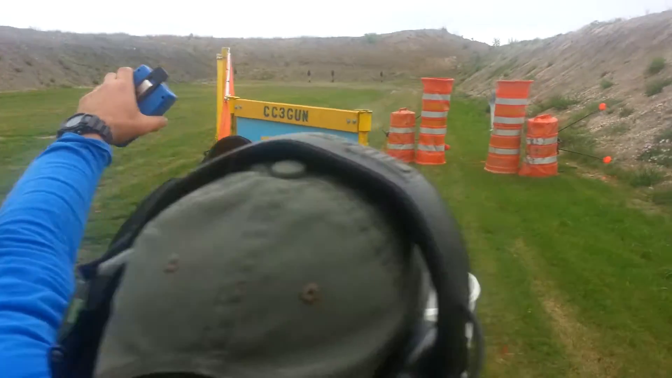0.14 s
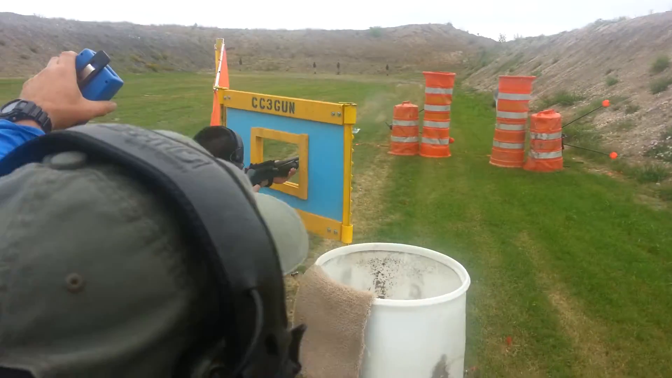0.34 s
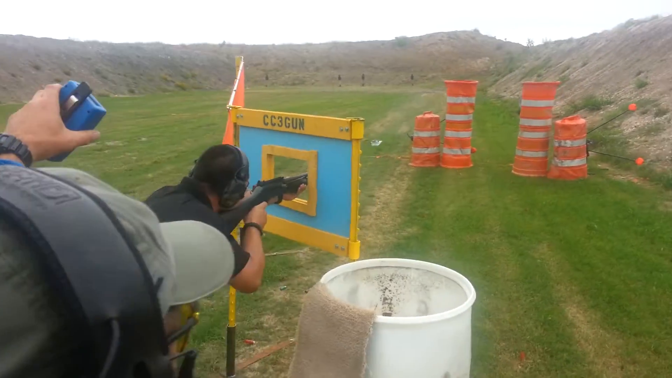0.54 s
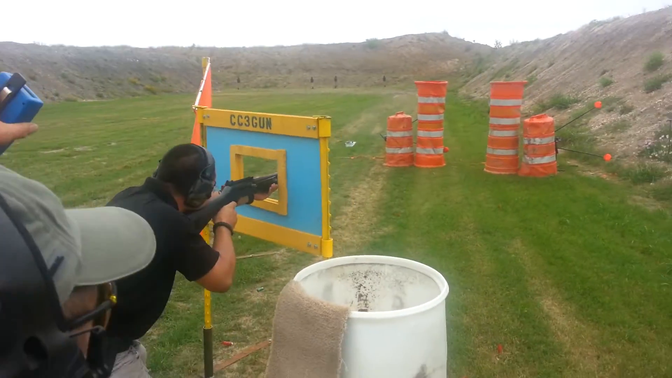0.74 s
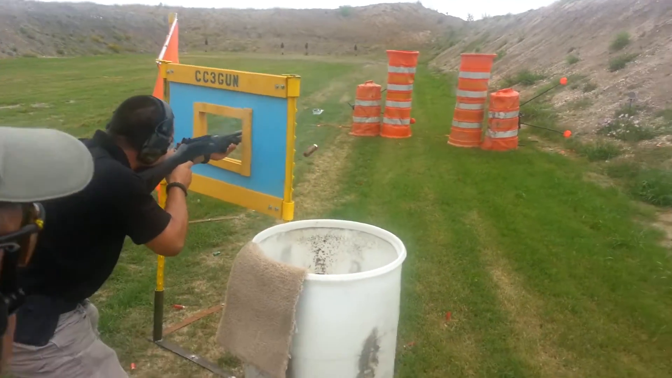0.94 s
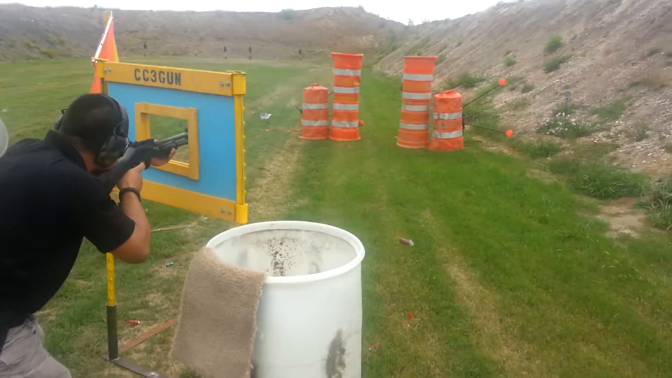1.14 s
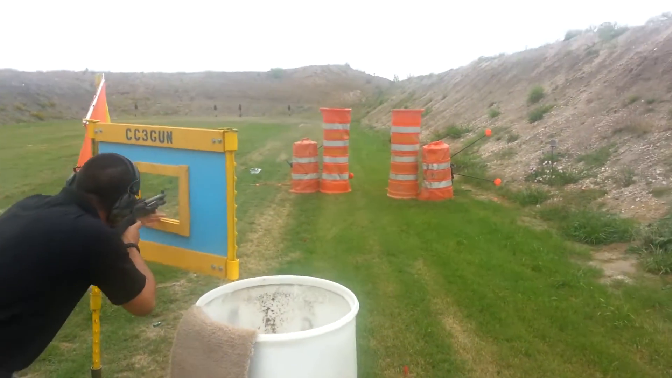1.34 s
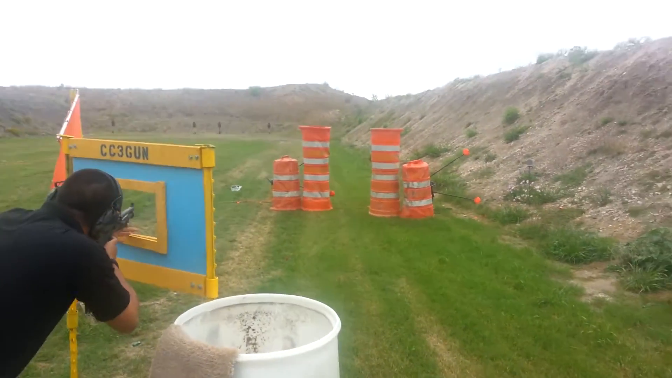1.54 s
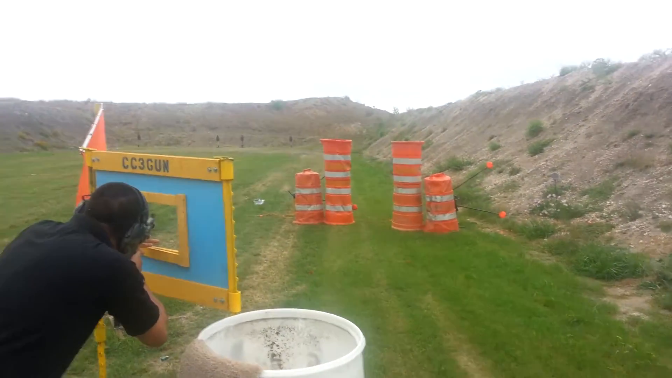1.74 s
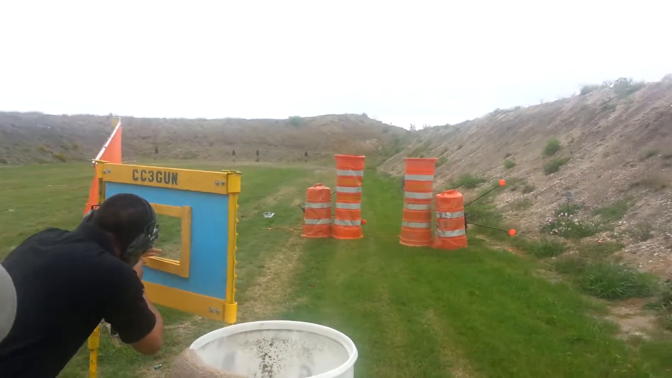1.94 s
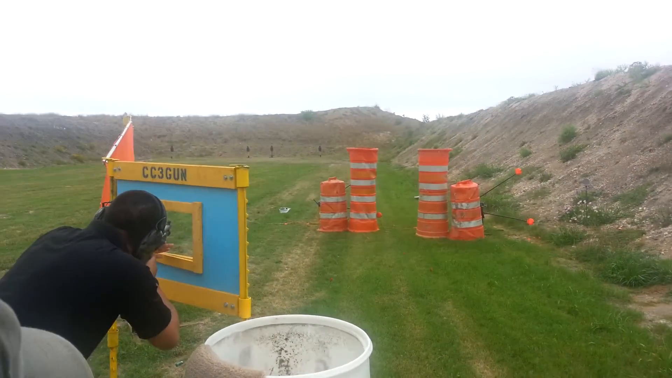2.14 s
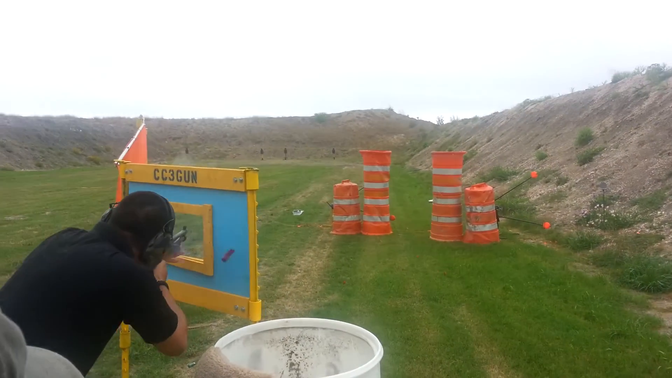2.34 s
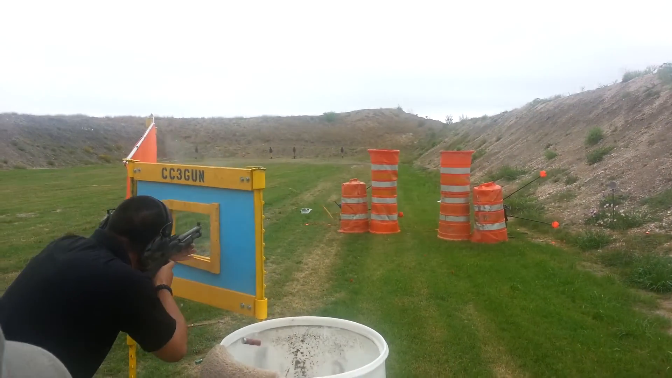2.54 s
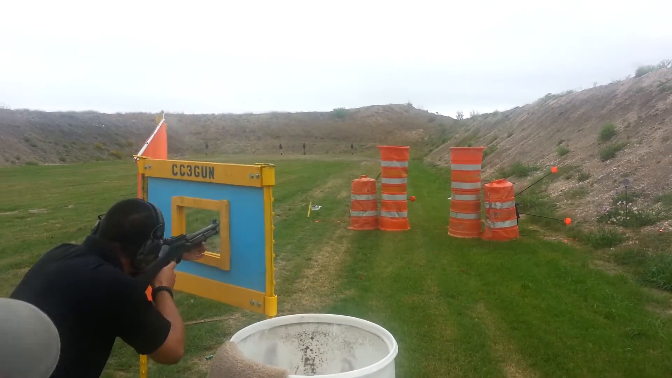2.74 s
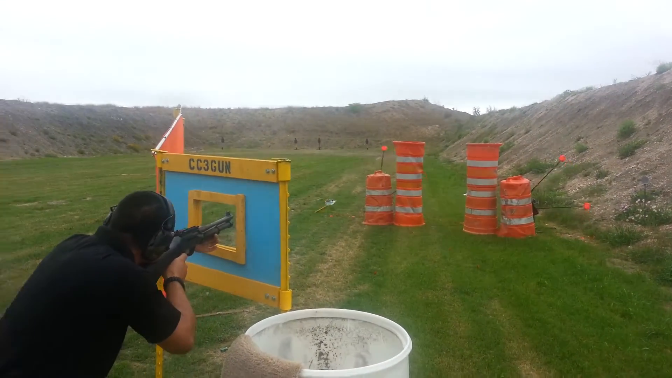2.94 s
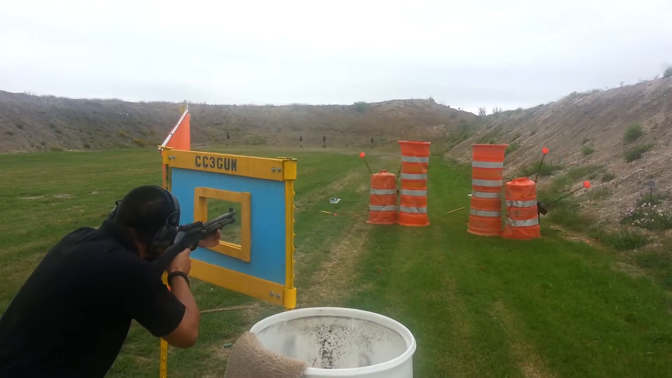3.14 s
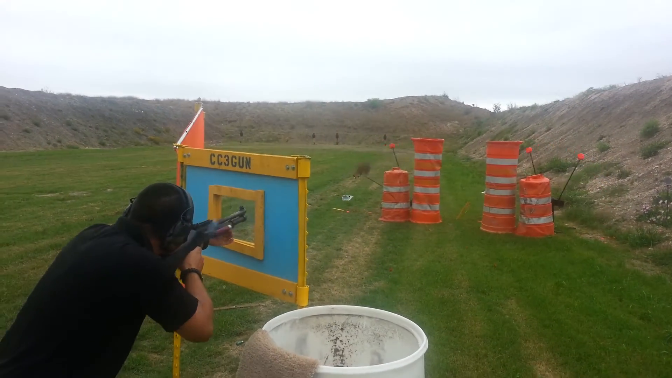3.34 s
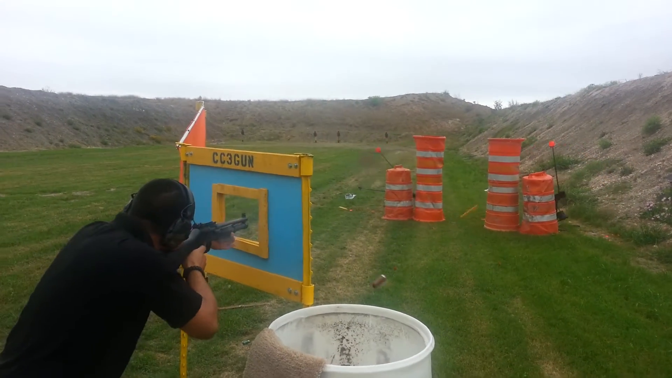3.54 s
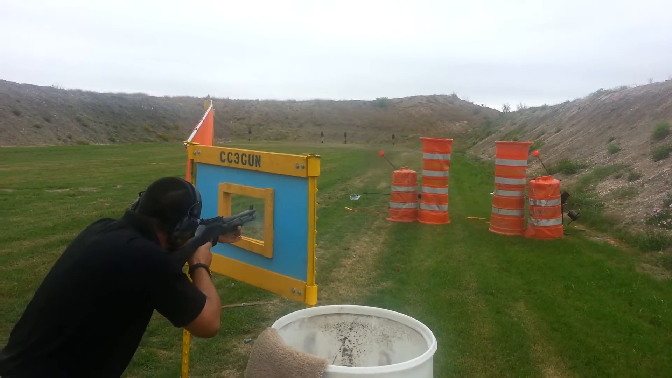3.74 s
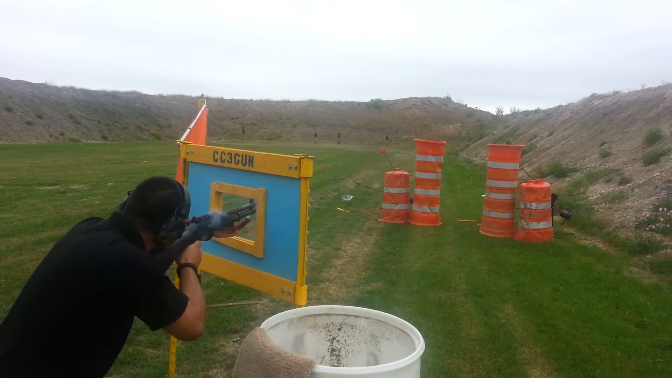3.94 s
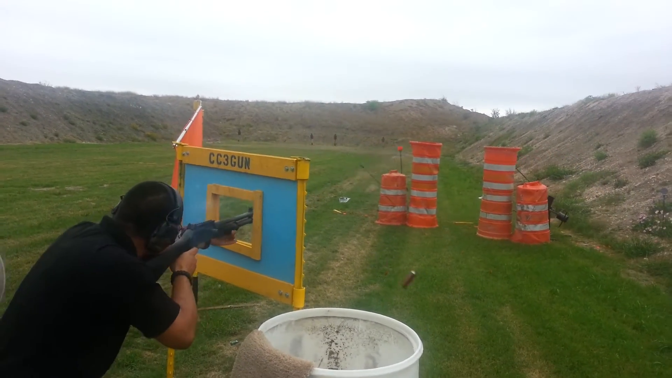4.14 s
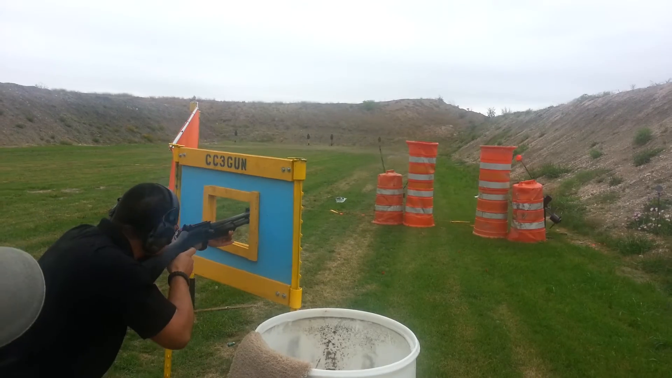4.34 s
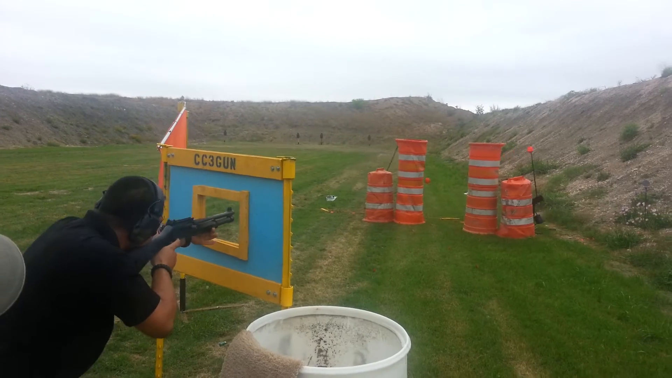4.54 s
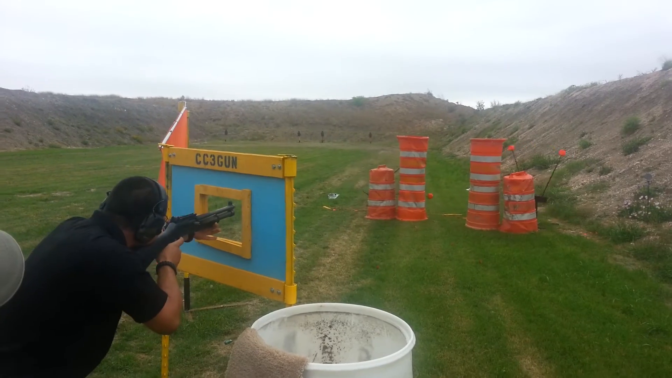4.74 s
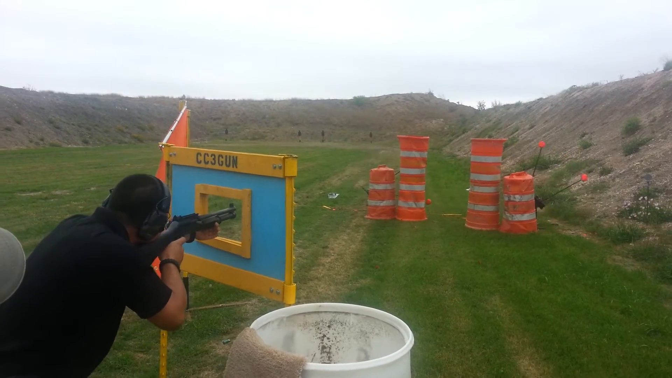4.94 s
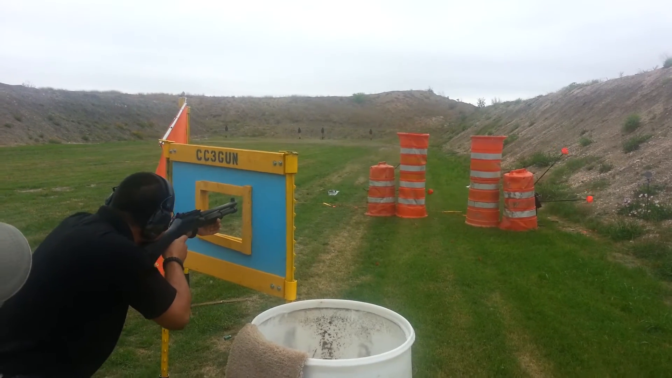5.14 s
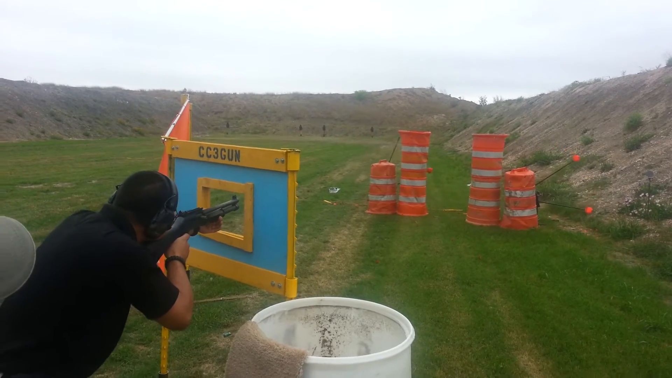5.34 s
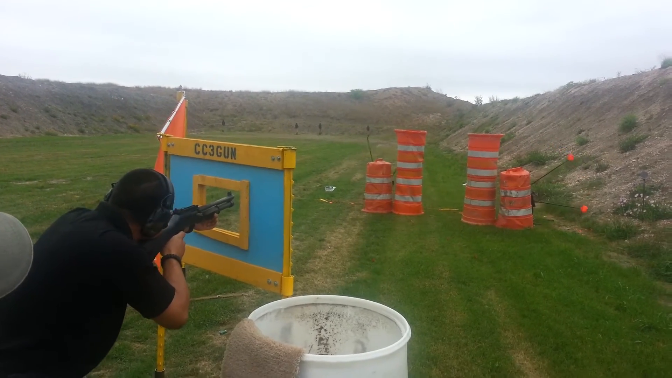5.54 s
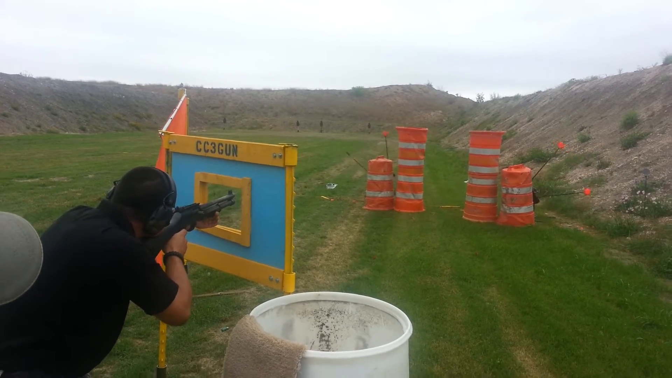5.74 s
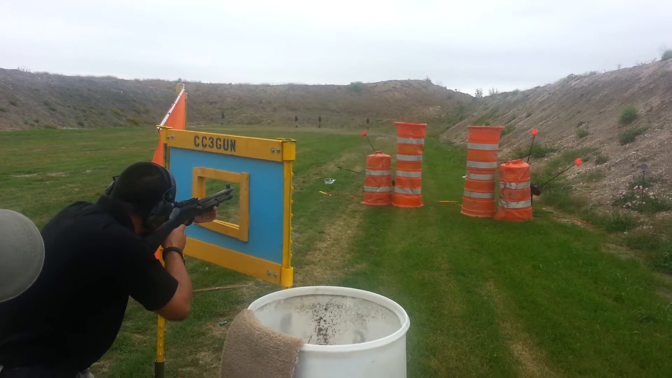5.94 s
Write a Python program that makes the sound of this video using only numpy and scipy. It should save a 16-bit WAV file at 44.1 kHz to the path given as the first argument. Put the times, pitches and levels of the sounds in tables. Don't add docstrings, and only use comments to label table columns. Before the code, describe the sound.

Beside a self-loading shotgun on a grassy outdoor range, gear rattles briefly before four distorted blasts, the last two in quick succession. Each rolls back from earth banks. The bolt slams, steel rings, and ejected shells knock on a hollow plastic drum between the second and third shots. Faint ticks and soft wind follow.

```python
import sys
import numpy as np
from scipy import signal
from scipy.fft import rfft, irfft
from scipy.io import wavfile
from scipy.ndimage import uniform_filter1d

SR = 44100
rng = np.random.default_rng(int(sys.argv[2]) if len(sys.argv) > 2 else 0)


def to_linear_factor(level_db):
    exponent = np.asarray(level_db, float) / 20
    return 10 ** exponent


def bounce(signal):
    frames = np.transpose(np.atleast_2d(signal))
    limited = np.clip(frames, -1, 1)
    pcm = np.round(limited * 32767).astype(np.int16)
    wavfile.write(sys.argv[1], SR, pcm)


N = 265041


def colour(x, points):
    hz, db = np.transpose(points)
    size = x.shape[-1]
    bins_hz = np.arange(size // 2 + 1) * SR / size
    gain = to_linear_factor(np.interp(np.log(bins_hz + 1), np.log(hz), db, left=-90, right=-90))
    y = irfft(rfft(x) * gain, size)
    return y / np.sqrt(np.mean(y ** 2))


def pair(size, alike):
    alike = np.clip(alike, 0, 1)
    mid, left, right = rng.standard_normal((3, size))
    return np.sqrt(alike) * mid + np.sqrt(1 - alike) * np.array([left, right])


def add(out, s, sound, pan_db):
    i = int(s * SR)
    sound = sound[..., :N - i]
    out[:, i:i + sound.shape[-1]] += sound * to_linear_factor(np.array([[pan_db], [-pan_db]]) / 2)


def fade(t, t60):
    return np.exp(-np.log(1000) * t / max(t60, 1e-3))


def bump(t, middle, half):
    return np.exp(-((t - middle) / max(half, 1e-3)) ** 2)


# middle t/s, level/dB, half length t/s
GUSTS = [(1.43, -53, .03), (2.672, -43, .015), (2.78, -45, .04), (2.87, -44, .04), (2.945, -41, .03),
         (3.135, -42, .03), (2.5, -42, .06), (3.3, -45, .05), (3.53, -45, .05), (4.11, -42, .05),
         (4.6, -50, .05), (4.835, -53, .02)]
# f/Hz, level/dB
WIND = [(25, -30), (60, -7), (110, -7), (160, 0), (260, -6), (420, -14), (800, -28), (1400, -60)]
# f/Hz, level/dB
THUD = [(45, -26), (110, -4), (190, 0.5), (310, -6), (550, -30)]
# f/Hz, level/dB
HISS = [(200, -10), (400, -1), (800, -2), (1500, -6), (2600, -7), (4100, -7), (5000, -11), (6300, -16),
        (9000, -11), (12000, -14), (14300, -17), (14800, -60)]
CALM_DB, HISS_DB = -55.5, -55


def air(duck):
    t = np.arange(N) / SR
    gust = np.sqrt(sum((to_linear_factor(db) * bump(t, s, half)) ** 2 for s, db, half in GUSTS))
    puffs = np.repeat(rng.standard_normal(N // 500 + 1), 500)
    puffs = uniform_filter1d(puffs, size=500)[:N]
    breeze = colour(pair(N, .4), WIND) * to_linear_factor(CALM_DB + 1.8 * puffs)
    buffets = colour(pair(N, .6), THUD) * gust * to_linear_factor(4.5 * puffs)
    hiss = to_linear_factor(HISS_DB) * colour(pair(N, .1), HISS)
    return breeze + buffets + duck * hiss


# f/Hz, level/dB, t60/s
BUCKLE = [(1705, -25, .1), (2178, -27, .13), (3560, -43, .5), (4100, -41, .15), (4700, -44, .2),
          (5580, -43, .3)]
# f/Hz, level/dB, t60/s
CLIP = [(2780, -35, .1), (5580, -36, .11)]
# f/Hz, level/dB, t60/s
PLATE = [(829, -26.5, .82), (1728, -40, .7)]
# f/Hz, level/dB, t60/s
BARREL = [(3685, -9, .17), (4400, -27, .15), (5103, -26.5, .55), (7720, -23, .25), (9012, -21, .2)]
# f/Hz, level/dB, t60/s
TUBE = [(4624, -22, .14), (7720, -28, .5), (12750, -34, .4)]
# f/Hz, level/dB, t60/s
BRASS = [(1841, -35, .1), (2616, -35, .1), (5500, -40, .06), (8339, -48, .12)]
# f/Hz, level/dB, t60/s
RIM = [(2080, -26, .045), (3300, -34, .035)]
# modes, t/s, swell/s, left minus right/dB
STRIKES = [
    (BUCKLE, 0.0, .004, 0),
    (CLIP, .205, .03, 0),
    (PLATE, .85, .02, 0),
    (PLATE, .93, .1, 0),
    (BARREL, 2.265, .03, -6),
    (TUBE, 2.385, .035, -6),
    (BRASS, 2.668, .003, -8),
    (RIM, 3.0715, .002, -4),
]
# t/s, f/Hz, level/dB, t60/s
PINGS = [
    (.194, 6750, -37, .09),
    (.194, 6080, -39, .05),
    (.194, 7350, -41, .06),
    (0.918, 10580, -25, .2),
    (1.434, 6900, -42, .04),
    (1.44, 1250, -44, .04),
    (4.027, 8950, -22, .1),
    (4.527, 1275, -28, .04),
]
PING_SWELL_S = .004


def rings():
    out, t = np.zeros((2, N)), np.arange(SR) / SR
    struck = [(s, swell, pan_db) + mode for modes, s, swell, pan_db in STRIKES for mode in modes]
    pings = [(row[0], PING_SWELL_S, 0) + row[1:] for row in PINGS]
    for s, swell, pan_db, hz, db, t60 in struck + pings:
        waver_cycles = 14 * t * (1 + rng.random()) + rng.random()
        waver = 1 + .2 * np.sin(2 * np.pi * waver_cycles)
        phase = rng.standard_normal((2, 1)) * hz / 2000
        tone = np.sin(2 * np.pi * hz * t + phase)
        swell_and_die = np.minimum(t / swell, 1) * fade(np.maximum(t - swell, 0), t60)
        add(out, s, to_linear_factor(db) * swell_and_die * waver * tone, pan_db)
    return out


# t/s, peak level/dB, crack level/dB, left minus right/dB
KNOCKS = [
    (2.765, 0, -5, -6),
    (3.031, -5, -6.5, -7),
    (3.221, -8, -7.5, -5.5),
]
# f/Hz, level/dB, t60/s
DRUM = [(644, -8, 0.15), (750, 7, 0.22), (910, -9.5, 0.27), (1435, 5, 0.054), (2540, -3.5, 0.034),
        (2640, -14.5, 0.064), (3570, -11.5, 0.038), (4230, -9.5, 0.041), (4100, -17, 0.039)]
# delay t/s, level/dB
DRUM_REPEATS = [
    (0.0032, -2.5),
    (0.0135, -13.5),
]
# f/Hz, level/dB
HOLLOW = [(120, -45), (300, -8.5), (600, 0.5), (1100, -5), (2000, -10.5), (4000, -35)]
DRUM_DAMP_S = .042


def knocks():
    out, t = np.zeros((2, N)), np.arange(4096) / SR
    for s, db, crack_db, pan_db in KNOCKS:
        for delay, bounce_db in [(0, 0.0064)] + DRUM_REPEATS:
            body = 0
            for hz, mode_db, t60 in DRUM:
                spot = rng.standard_normal(3)
                tone = np.sin(2 * np.pi * hz * t + .6 * spot[1:, None])
                body = body + to_linear_factor(mode_db + 1.5 * spot[0]) * tone * fade(t, min(t60, DRUM_DAMP_S))
            crack = colour(pair(len(t), 0.94), CRACK) + to_linear_factor(-19) * colour(pair(len(t), .2), SIZZLE)
            snap = to_linear_factor(crack_db + 12) * crack * (fade(t, .008) + to_linear_factor(-8) * fade(t, .05))
            tail = to_linear_factor(-1) * colour(pair(len(t), .6), HOLLOW) * (fade(t, .07) + to_linear_factor(-15) * fade(t, .17))
            add(out, s + delay, to_linear_factor(db + bounce_db - 15) * (body + tail + snap), pan_db)
    return signal.sosfilt(signal.butter(3, 430, "high", fs=SR, output="sos"), out)


# t/s, peak level/dB, loudest f/Hz, treble level/dB, length t/s
GEAR = [(0.0024, -26.5, 1700, -15.5, 0.074), (0.034, -34, 2030, -8.5, 0.055), (0.06, -37, 1400, -13, .08),
        (0.1413, -40.5, 1660, -13, 0.04), (0.165, -36.5, 1430, -9, 0.09), (0.194, -28, 1540, -5, 0.046),
        (0.215, -32, 1800, -8, .07), (0.2627, -46.5, 1060, -8, 0.039), (0.2852, -41, 1950, -12, 0.055)]
# t/s, peak level/dB, loudest f/Hz, length t/s
SCUFFS = [(0.0, -36, 580, .12), (0.14, -42, 500, .06), (0.19, -38, 600, .1), (0.255, -40, 450, .06),
          (2.544, -21, 700, .04)]
# t/s, peak level/dB, loudest f/Hz, treble level/dB, left minus right/dB
BOLT_BACK = [
    (0.8589, -9, 1270, -12, -3),
    (0.8744, -17.5, 2760, -7.5, -4.5),
    (3.413, -9, 2300, -16, 1.5),
    (3.984, -6, 2764, -16, -0.5),
]
# t/s, peak level/dB, loudest f/Hz, treble level/dB, rebound level/dB
BOLT_SHUT = [
    (0.9082, -5, 2130, -8, -5),
    (2.334, -9, 2000, -5, -12),
    (3.431, 1.5, 3900, -1.5, -3),
    (4.0133, -3, 3800, -0.5, -4),
]
# t/s, peak level/dB, loudest f/Hz, length t/s, left minus right/dB
CLAPS = [(1.1544, -28.5, 1990, 0.046, 0.5), (1.1862, -22.5, 1327, 0.023, -6), (2.496, -24, 1660, 0.053, -4),
         (2.5487, -23.5, 3700, 0.024, -7.5), (3.649, -27.5, 1900, 0.047, -3), (3.694, -24, 1400, 0.04, 1.2),
         (4.228, -27, 2000, .015, -2.2), (4.273, -21.5, 1960, 0.017, -1.5), (4.3068, -23.5, 1970, 0.03, 5),
         (4.3314, -34, 1630, 0.017, 1.5)]
# t/s, peak level/dB, loudest f/Hz, treble level/dB, length t/s
TICKS = [(0.358, -52, 3900, 6, .015), (1.3, -50, 3000, -10, .08), (1.404, -46, 1100, -10, .02),
         (1.428, -48, 4000, 6, .03), (1.435, -37, 4090, 4, .025), (1.4416, -39, 1210, -3, 0.03),
         (2.544, -26, 900, 2.5, .02), (2.995, -24, 1200, -4, .05), (3.0045, -17, 3200, -2, .02),
         (3.2935, -24, 1500, -18, .03), (4.4, -48, 1000, -4, .02), (4.522, -44, 3000, 5, .012),
         (4.6, -41, 2600, 3, .01), (4.79, -60, 4000, 8, .01), (4.99, -60, 4000, 8, .01),
         (5.13, -55, 4400, 2, .01)]
# t/s, peak level/dB, loudest f/Hz, treble level/dB, left minus right/dB
CLICKS = [(0.8635, -13, 4800, 10.5, 3.5), (0.9472, -17.5, 3950, 0, -3.5), (2.3305, -23, 5000, 12, -6),
          (1.1193, -20, 2010, -5.5, -1.0), (2.6675, -28.5, 1800, -14, -5), (3.0709, -26.5, 2090, 2, -3),
          (3.479, -20, 3330, 1, 2), (3.7775, -29, 1786, -7, 3.0), (3.9931, -9, 2762, -10.5, -1.5),
          (4.0534, -18.5, 3270, 0, 2), (4.2338, -22, 1790, -12.5, 1)]
GEAR_PAN_DB, SCUFF_TOP_DB, SCUFF_PAN_DB = -1.5, -30, -1.5
BOLT_S, BOLT_PAN_DB, REBOUND_S, REBOUND_HZ, REBOUND_TOP_DB = .03, -3.5, .0047, 3200, -5
CLAP_TOP_DB, CLICK_S = -18, .014
TICK_LEAN_DB = -6


def clack_rows():
    rows = [row + (GEAR_PAN_DB,) for row in GEAR]
    rows += [(s, db, hz, SCUFF_TOP_DB, length, SCUFF_PAN_DB) for s, db, hz, length in SCUFFS]
    rows += [(s, db, hz, top_db, BOLT_S, pan_db) for s, db, hz, top_db, pan_db in BOLT_BACK]
    for s, db, hz, top_db, rebound_db in BOLT_SHUT:
        rows.append((s, db, hz, top_db, BOLT_S, BOLT_PAN_DB))
        rows.append((s + REBOUND_S, rebound_db, REBOUND_HZ, REBOUND_TOP_DB, BOLT_S, BOLT_PAN_DB / 2))
    rows += [(s, db, hz, CLAP_TOP_DB, length, pan_db) for s, db, hz, length, pan_db in CLAPS]
    rows += [row + (TICK_LEAN_DB * (row[1] > -32),) for row in TICKS]
    rows += [(s, db + 4.5, hz, top_db, CLICK_S, pan_db) for s, db, hz, top_db, pan_db in CLICKS]
    return rows


def clacks():
    out, t = np.zeros((2, N)), np.arange(4096) / SR
    for s, db, hz, top_db, length, pan_db in clack_rows():
        shelf_db = min(1.1 * top_db - 5, -8)
        resonance = [(hz / 3, -24), (hz / 1.8, -8), (hz, 0), (hz * 1.3, -7), (5600, shelf_db), (7000, -45)]
        body = colour(pair(len(t), .2), resonance)
        edge = colour(pair(len(t), 0.13), SIZZLE) * to_linear_factor(top_db)
        chatter = np.minimum(t / .0005, 1) * fade(t ** 2 / length, length)
        chatter = chatter + to_linear_factor(-18) * fade(t, 3 * length)
        add(out, s, to_linear_factor(db - 5.5) * chatter * (body + edge), pan_db)
    return out


# delay t/ms, level/dB, hold t/ms, fall/(dB per ms), dullness 0-1
PATHS = [
    (-7.5, -21, 7, 3.0, 0.05),
    (0.4, 6.5, 22, 0.68, 0.01),
    (41.5, -0.6, 15, 0.8, 0.99),
    (42, -14, 1.5, 0.075, 0.06),
    (384, -30, 59, 0.6, 0.25),
]
RISE_MS, SAG_DB_PER_MS = 1.6, .2
RANGE_END_MS, END_DROP_DB, END_DROP_MS, END_FALL_DB_PER_MS = 447, -6, 22, .07


def paths(ms, sharp_db, dull_db):
    power = 0
    for delay, db, hold, fall, dull in PATHS:
        since = ms - delay
        path_db = db + sharp_db + dull * (dull_db - sharp_db)
        path_db = path_db - SAG_DB_PER_MS * np.clip(since, 0, hold) - fall * np.maximum(since - hold, 0)
        rise = np.clip(1 + since / RISE_MS, 0, 1) ** 2
        power = power + (to_linear_factor(path_db) * rise) ** 2
    past = np.maximum(ms - RANGE_END_MS, 0)
    return np.sqrt(power) * to_linear_factor(END_DROP_DB * np.minimum(past / END_DROP_MS, 1) - END_FALL_DB_PER_MS * past)


# t/s, charge level/dB, left minus right/dB, boom level/dB, sizzle level/dB
SHOTS = [
    (0.777, -1, -1, -7, 0.5),
    (2.2072, -3, -5, -7, 0.5),
    (3.3105, -0.5, 1, -8, 0),
    (3.8904, -0.5, 0.5, -7.5, 0),
]
# f/Hz, level/dB
BOOM = [(25, -25.5), (70, -14.5), (150, -8), (260, 3), (500, 0.5), (1100, -2), (1900, -10), (3500, -36)]
# f/Hz, level/dB
CRACK = [(300, -30.5), (800, -4.5), (1500, -2), (2600, -1.5), (4200, -1.5), (5200, -6), (6500, -30.5)]
# f/Hz, level/dB
SIZZLE = [(3500, -32), (5200, -8.5), (6300, -1.5), (8500, 0.5), (10500, -1.5), (12000, -9), (13500, -11),
          (15000, -19.5), (21000, -50)]
BOOM_SHARP_DB, BOOM_DULL_DB, SIZZLE_SHARP_DB, SIZZLE_DULL_DB = -6.8, 4.2, -1.6, -8
AIR_DB_PER_MS = .009
THUD_MS, THUD_DB, THUD_HALF_MS = 372, -39, 28


def shots():
    out = np.zeros((2, N))
    size = 32768
    ms = np.arange(size) / SR * 1000 - 10
    for s, db, pan_db, low_db, top_db in SHOTS:
        lumps = np.repeat(rng.standard_normal((3, 128)), 256, axis=1)
        lumps = uniform_filter1d(lumps, size=256) * np.clip(ms / 100, 0, 1)
        boom = colour(pair(size, .85), BOOM) * to_linear_factor(low_db + 3.5 * lumps[0])
        boom = boom * paths(ms, BOOM_SHARP_DB, BOOM_DULL_DB)
        crack = colour(pair(size, .1), CRACK) * to_linear_factor(2.2 * lumps[1]) * paths(ms, 0, 0)
        sizzle = colour(pair(size, 0.032), SIZZLE) * to_linear_factor(top_db + 1.5 * lumps[2] - AIR_DB_PER_MS * ms)
        sizzle = sizzle * paths(ms, SIZZLE_SHARP_DB, SIZZLE_DULL_DB)
        thud = colour(pair(size, .6), THUD) * to_linear_factor(THUD_DB) * bump(ms, THUD_MS, THUD_HALF_MS)
        add(out, s + ms[0] / 1000, to_linear_factor(db) * (boom + crack + sizzle + thud), pan_db)
    return out


DEAF_MS, DEAF_HALF_MS, DEAF_HZ = 205, 40, 110


def deafen(field):
    ms = np.arange(N) / SR * 1000
    deaf = sum(bump(ms, shot[0] * 1000 + DEAF_MS, DEAF_HALF_MS) for shot in SHOTS)
    bass = signal.sosfiltfilt(signal.butter(2, DEAF_HZ, fs=SR, output="sos"), field)
    return field - np.minimum(1.3 * deaf, 1) * bass


def scene():
    blasts = shots()
    loud = uniform_filter1d(np.abs(blasts).mean(axis=0), size=1500)
    duck = 1 / (1 + loud / to_linear_factor(-41))
    return deafen(air(duck) + rings() + knocks() + clacks() + blasts)


# t/ms after a shot, highest f/Hz kept
KEPT = [(-30, 14700), (0, 16000), (70, 15200), (150, 14300), (200, 12800), (300, 11700), (440, 11400),
        (480, 14700)]


def thin_tails(x):
    hz, s, frames = signal.stft(x, SR, nperseg=512)
    ms, kept_hz = np.transpose(KEPT)
    since = np.array([1000 * (s - shot[0]) for shot in SHOTS])
    latest = np.where(since > ms[0], since, np.inf).min(axis=0)
    overload = np.sum(np.abs(frames) ** 2, axis=(0, 1)) > .06
    top_hz = np.where(overload, SR, np.interp(latest, ms, kept_hz))
    ragged = np.kron(rng.standard_normal((65, len(s) // 4 + 1)), np.ones((4, 4)))[:len(hz), :len(s)]
    edge_hz = top_hz + (14700 - top_hz).clip(0, 450) * (ragged - .4)
    return signal.istft(frames * (hz[:, None] < edge_hz), SR, nperseg=512)[1][:, :N]


def top_cut(x):
    return signal.sosfilt(signal.butter(12, 15580, fs=SR, output="sos"), x)


def record(dry):
    clipped = np.clip(dry, -.98, .98)
    low_pass = signal.butter(4, 15500, fs=SR, output="sos")
    mix = signal.sosfilt(low_pass, thin_tails(clipped))
    return top_cut(mix)


dry = scene()
out = record(dry)
bounce(out)
```